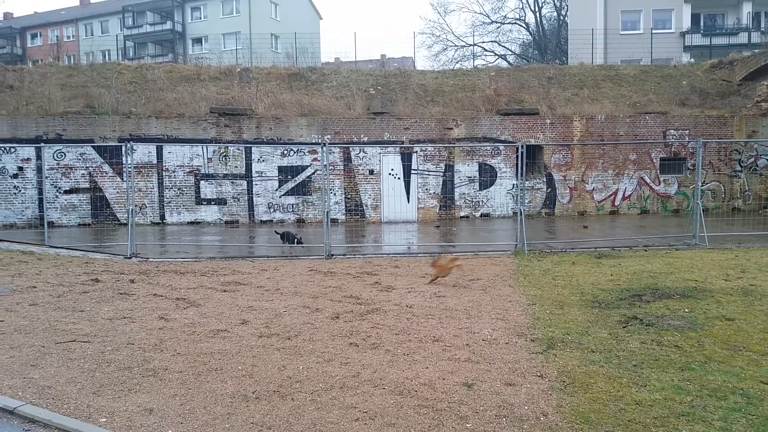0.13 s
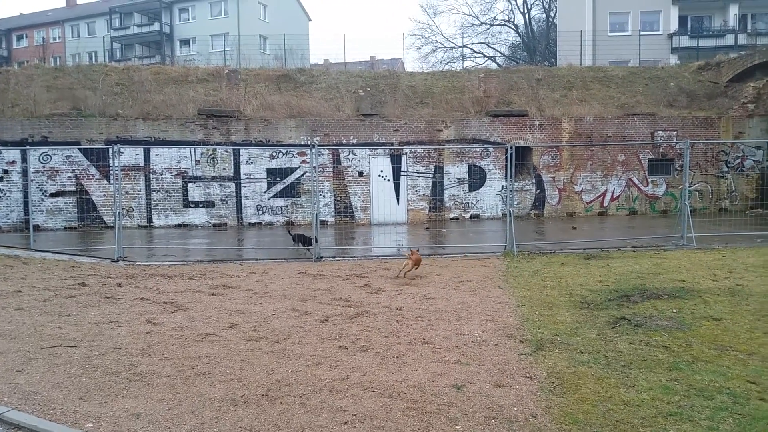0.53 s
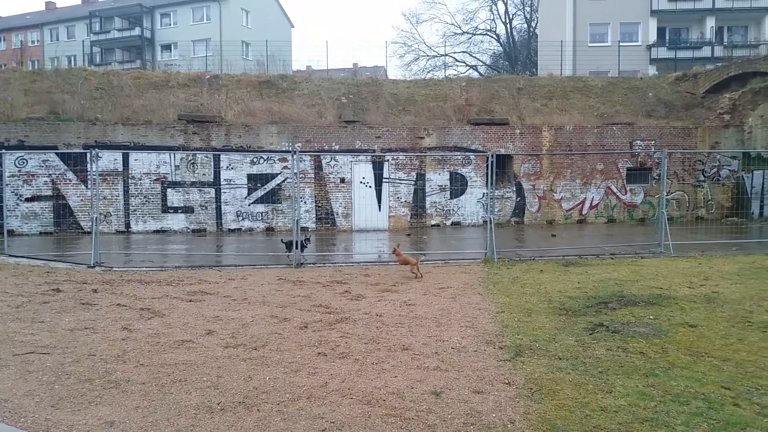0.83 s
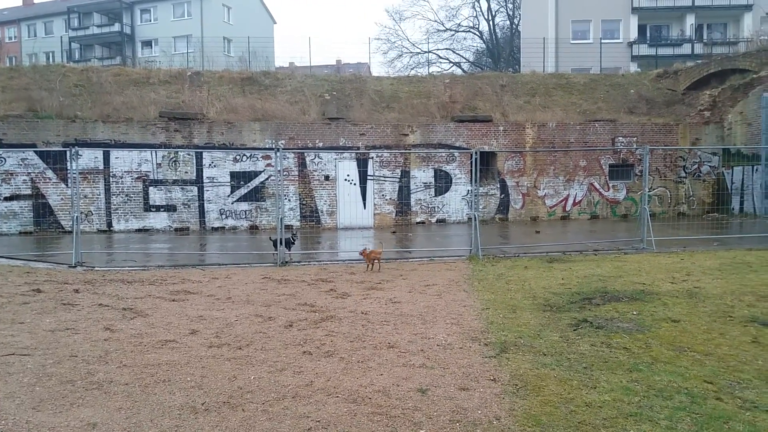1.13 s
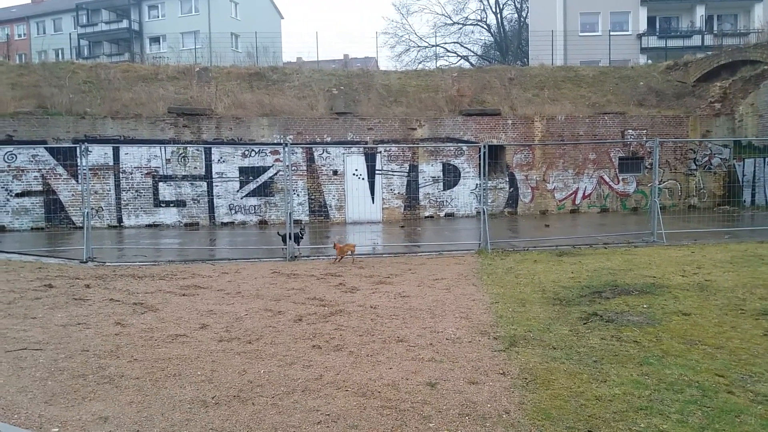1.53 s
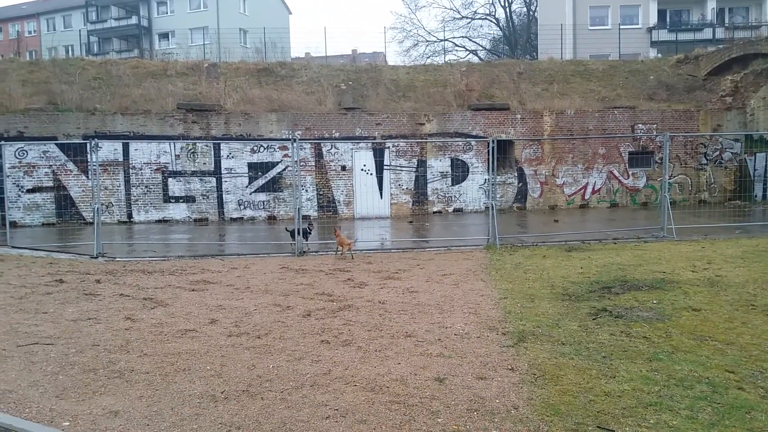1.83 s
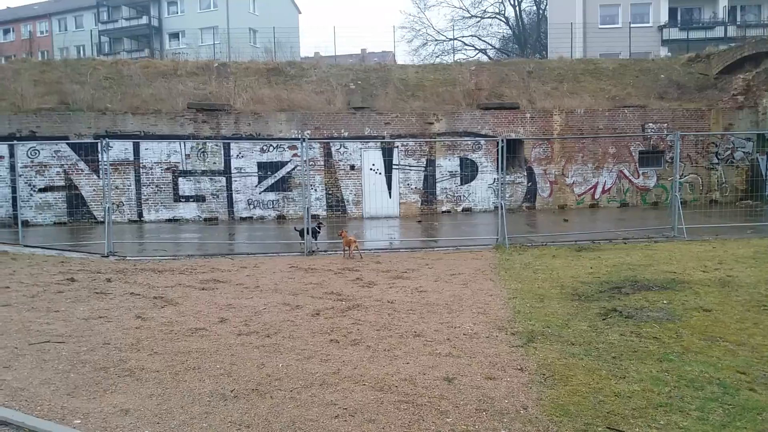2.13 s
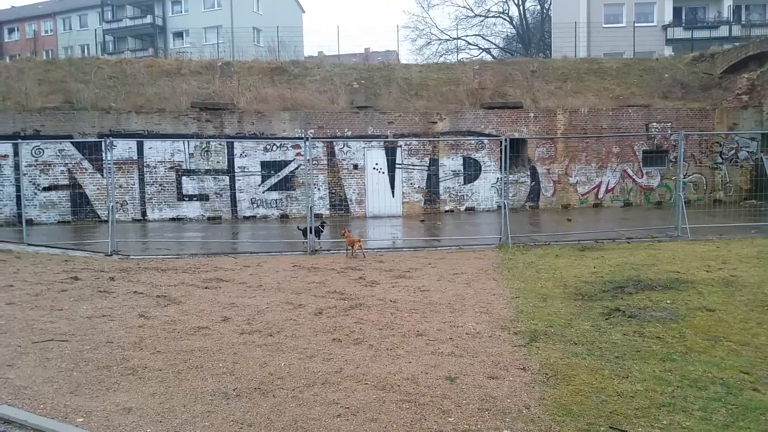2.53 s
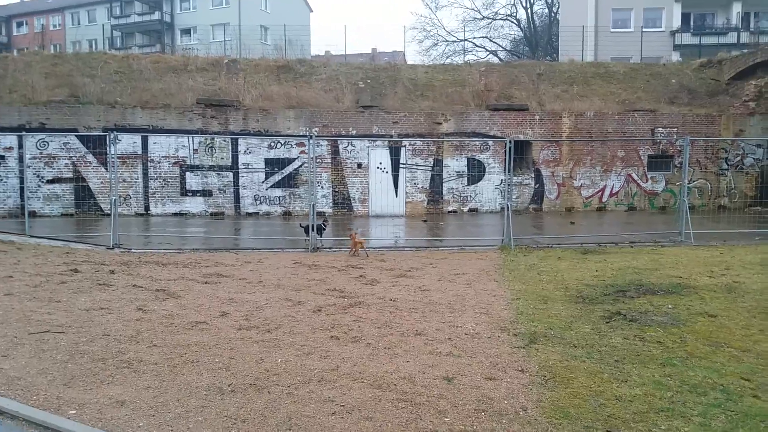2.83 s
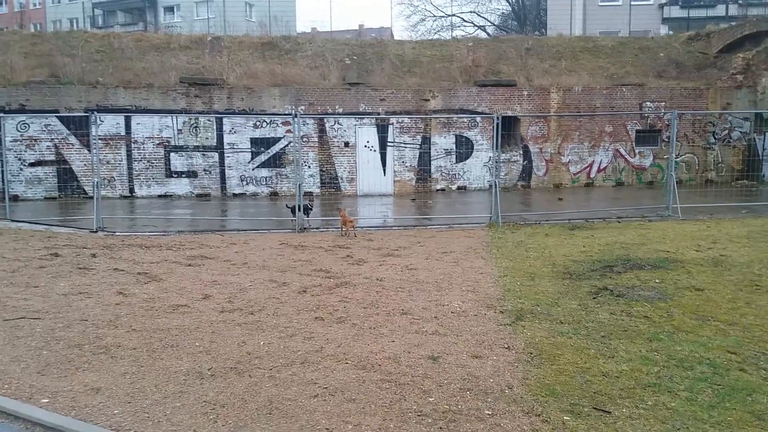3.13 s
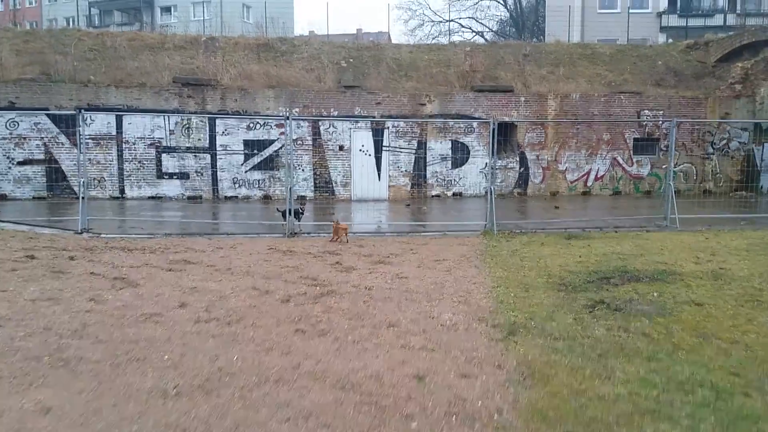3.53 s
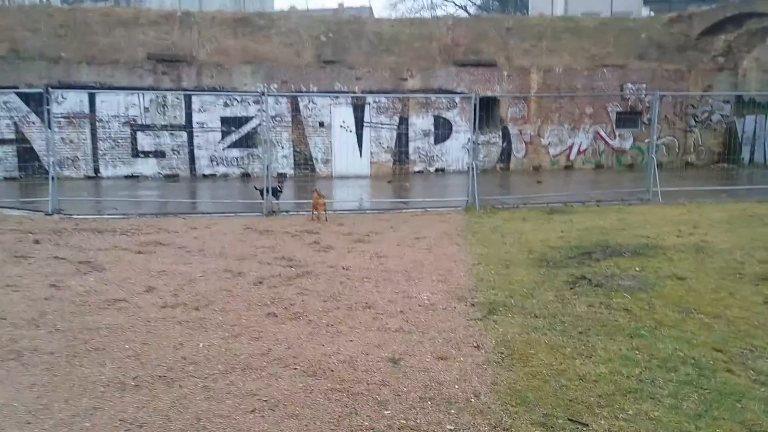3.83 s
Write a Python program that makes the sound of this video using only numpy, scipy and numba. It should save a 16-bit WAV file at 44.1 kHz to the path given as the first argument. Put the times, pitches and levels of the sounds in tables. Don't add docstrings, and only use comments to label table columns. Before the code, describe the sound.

A small dog some twenty metres off yaps twice quickly, then three more times with pauses; a brick wall echoes each. Wind buffets the phone microphone over town hum, and gravel ticks close by near the end.

```python
import sys
import numpy as np
from scipy import signal
from scipy.fft import rfft, irfft
from scipy.io import wavfile
from scipy.ndimage import uniform_filter1d
from numba import njit

SR = 44100
rng = np.random.default_rng(int(sys.argv[2]) if len(sys.argv) > 2 else 0)


def transcribe(signal):
    frames = np.atleast_2d(signal).T
    limited = np.clip(frames, -1, 1)
    pcm = np.round(limited * 32767).astype(np.int16)
    wavfile.write(sys.argv[1], SR, pcm)


def gain_from_db(level_db):
    decades = np.asarray(level_db, float) / 20
    return 10 ** decades


N = 176400
T = np.arange(N) / SR

# freq_hz, density_db
TOWN_SPECTRUM = [(200, -0.5), (600, 1.5), (1300, 0.5), (3300, -10), (4500, -16), (5200, -27.5), (6200, -30),
                 (15900, -29)]
TOWN_DB = -47
# time_s, level_db
TRAFFIC = [(0, 2), (.9, -2), (1.4, -2.5), (2.5, -2.5), (3.2, -1.5), (4, -2.5)]
# freq_hz, level_db
MOTOR_TONES = [(204.6, -48), (323.0, -52)]
MOTOR_SWELL_S = (3.301, 3.45, 3.8, 4.0)
# freq_hz, level_db
WHINE = [(13001, -93), (14998, -87)]

# time_s, level_db
GUST = [(0, -26), (.3, -26), (0.57, -24), (.66, -22), (.84, -29), (1.2, -35.5), (1.45, -40.5),
        (1.75, -31.5), (2.0, -40), (2.27, -36), (2.47, -41), (2.62, -36), (2.76, -35), (2.9, -27),
        (3.15, -28.5), (3.4, -36.5), (3.579, -31.5), (4, -40)]
# freq_hz, density_db
WIND_SPECTRUM = [(22, -72), (50, -4), (110, -1), (215, -10), (380, -20), (700, -36)]
# start_s, peak_db, pitch_hz
BUFFETS = [(0.025, -3, 111), (0.126, -8, 93), (0.612, -7.5, 137), (0.658, -3, 150.6), (1.11, -18, 124),
           (1.657, -21, 109), (1.69, -21.5, 119), (1.744, -17, 93), (2.103, -15, 96), (2.311, -18, 96.4),
           (2.576, -20.5, 127), (2.833, -25, 91), (0.151, -16, 101), (.7, -10, 108.4), (3.016, -15, 98),
           (3.121, -20, 153), (3.151, -15, 137), (3.2, -14, 103), (2.245, -14.5, 128), (2.685, -14, 107),
           (2.886, -6.5, 89.5), (2.99, -12, 119.5), (3.065, -16, 134), (3.838, -13.5, 95.5)]
BUFFET_S = 0.0094

# time_s, pitch_hz, level_db
CHIRP = [
    (1.091, 3610, -82),
    (1.097, 4070, -56),
    (1.107, 4410, -61),
    (1.141, 4470, -54.5),
    (1.15, 4170, -61),
    (1.158, 4470, -84),
]
# time_s, pitch_hz, level_db
PIP = [
    (1.071, 5100, -86),
    (1.078, 5400, -71),
    (1.085, 6130, -74),
    (1.091, 6300, -91),
]

# start_s, peak_db, ring_hz
TICKS = [(3.019, -54, 4000), (3.152, -54, 4000), (3.225, -54, 3500), (3.3495, -43, 2600),
         (3.352, -42, 3000), (3.3545, -40, 2200), (3.358, -45, 4500), (3.3628, -32, 3000),
         (3.3795, -47, 5200), (3.3912, -35, 4000), (3.3925, -35, 4600), (3.3944, -33, 3600),
         (3.4025, -37, 4300), (3.4045, -37, 3600), (3.409, -40, 4500), (3.42, -43, 3800),
         (3.586, -46, 7500), (3.735, -55, 5000)]
TICK_TOP_HZ = 9500
# start_s, length_s, level_db
SCUFFS = [
    (0, 0.056, -58.5),
    (0.258, .035, -57.5),
    (0.772, 0.025, -63),
    (3.363, 0.0224, -79),
    (3.412, 0.0272, -68),
]
START_CLICK_DB, START_CLICK_S = -44.5, .002

# time_s, pitch_hz, level_db, roughness_0_1, mouth_opening_0_1
YAP_1 = [
    (-.06, 1200, -38, 0.03, 0.8),
    (-.035, 1372, -21, .3, 0.84),
    (.01, 1320, -24, 0.19, 0.82),
    (0.023, 1199, -42, 0.42, 1),
    (.035, 1196, -27.5, 0.08, 0.9),
    (0.048, 1066, -36, 0.46, 1.15),
    (0.063, 819, -28, 0, 0.87),
    (0.073, 760, -34.5, 0.1, 0.98),
]
YAP_2 = [
    (.281, 648.4, -42, 0.12, 0.038),
    (0.291, 702.4, -28, 0.11, 0.15),
    (0.314, 821.7, -22.5, 0.52, 0.76),
    (0.333, 1002, -22.5, 0.21, 0.8),
    (.346, 844.5, -25.5, 0.99, 1),
    (0.356, 907.7, -21.5, 0.5, 1),
    (.386, 907.5, -22.5, 0.11, 0.7),
    (0.399, 803, -21.5, 0.15, 1),
    (0.411, 700, -50, 0.44, 0.052),
]
YAP_3 = [(1.727, 642, -41, 0.3, 0.054), (1.735, 694.4, -29.5, 0.67, 0.066), (1.751, 783.7, -27, 0.35, 0.75),
         (1.764, 787, -27, 0.55, 0.75), (1.785, 727.3, -26.5, 0.66, 0.87), (1.794, 771, -22, 0.29, 0.58),
         (1.797, 1210, -21.5, 0.044, 0.86), (1.821, 1186, -22.5, 0.042, 1.12),
         (1.828, 1030, -31, 0.36, 1.04), (1.838, 810, -23, 0.19, 0.3), (1.848, 755, -37.5, 0.18, 0.091)]
YAP_4 = [
    (2.742, 715.3, -52, 0.13, 0),
    (2.756, 789.5, -28, 0.33, 0),
    (2.775, 810, -30, 0.85, 0.53),
    (2.796, 655.4, -31.5, 0.4, 0.63),
    (2.827, 677, -28.5, 0.55, 0.78),
    (2.847, 830.3, -24.5, 0.49, 0.12),
    (2.857, 760, -24, 0.089, 0.88),
    (2.871, 690, -57, 0.18, 0),
]
YAP_5 = [
    (3.486, 711, -66, 0.48, 0.22),
    (3.494, 760, -29.5, 0.33, 0),
    (3.519, 808.8, -27.5, 0.5, 0.46),
    (3.553, 882.4, -26.5, 0.81, 0.94),
    (3.565, 862.3, -26, 0.39, 1),
    (3.583, 847.5, -26.5, 0.85, 0.5),
    (3.598, 760, -26, 0.16, 1),
    (3.612, 700, -84, .3, 0.58),
]
# closed_hz, open_hz, width_hz, closed_db, open_db
TRACT = [(760, 957, 350, -6, 4.5), (1200, 1464, 333, -15.5, -0.5), (1730, 1573, 75, -32.5, -1.5),
         (1620, 2140, 425, -26, 2.5), (3440, 3440, 280, -47, -17), (4540, 4750, 560, -38.5, -23.5),
         (4900, 5550, 450, -45.5, -29), (7000, 6560, 1400, -58, -34.5), (8400, 8400, 3000, -73, -38)]
# mouth_size_factor, res1_db, res2_db, res3_db, res4_db
VOICING = [
    (1.08, 3, -8, 9.5, 1.5),
    (1.046, 4, -6, 4.5, 4.5),
    (0.989, -2, 3, -5, -0.5),
    (0.998, -2, 3.5, 1.5, 4),
    (0.933, -1, 3.5, 5.5, 0.5),
]
RINGS = [
    (-1, -1, -6, -5, -1),
    (-5, 0.5, -1.5, 4, -1),
    (3, 0, -3, -3, -6),
    (9, 2, 3.5, 2, 0),
    (-5, 0.5, 2, 5, -7),
]
# growl_hz, speedup_hz_per_s, depth_db
GROWL = [
    (44.5, -10, 2),
    (49.7, -2.5, 1.5),
    (56, -1, 2),
    (60.7, 0, 5.5),
    (37, 170, 5),
]
JITTER, SHIMMER_DB, CHAOS_HZ, CORD_TILT = .18, 3.5, 180, .6
BREATH_DB, FLUTTER_HZ, FLUTTER_DB = 2, 60, 3
PATCH_HZ, PATCH_DB = 25, 2.5
LEAD_S = .1

# lag_s, level_db, far_tail_db
WALL = [
    (0.059, -16, 2.5),
    (0.055, -8.5, 3.5),
    (.0465, -6.5, 1.5),
    (0.034, -5.5, 3),
    (.0477, -6, 5.5),
]
WALL_TILT, SCATTER_S, SCATTER_DB = 1, 0.016, -3
FAR_ECHO_S, FAR_ECHO_DB = 0.068, -12.5
TAIL_DB, TAIL_T60_S, TAIL_START_S, TAIL_HZ, TAIL_WIDTH_HZ = -9.5, 1, 0.033, 1910, 2800
# freq_hz, width_hz, level_db
NICHES = [
    (1460, 70, 11),
    (1640, 60, 10),
    (2460, 120, 9.5),
    (6000, 3500, 6),
]


def unit(x):
    return x / np.sqrt(np.mean(x ** 2) + 1e-30)


@njit
def moving_band(x, hz, width_hz):
    y, b, l = np.empty(len(x)), 0., 0.
    for i in range(len(x)):
        g, k = np.tan(np.pi * hz[i] / SR), width_hz / hz[i]
        v = (b + g * (x[i] - l)) / (1 + g * (g + k))
        b, l, y[i] = 2 * v - b, l + 2 * g * v, k * v
    return y


def band(x, hz, width_hz):
    return moving_band(x, np.full(len(x), 1. * hz), 1. * width_hz)


def walk(rate_hz, size=N):
    k = max(int(SR / rate_hz), 1)
    held = np.repeat(rng.standard_normal(N // 50)[:size // k + 1], k)
    return 1.288 * uniform_filter1d(uniform_filter1d(held, k), k)[:size]


def bands(table, step_oct, wobble_db):
    hz, db = np.array(table).T
    f, out = np.arange(N // 2 + 1) * SR / N + 1e-3, 0
    shape = gain_from_db(np.interp(np.log(f), np.log(hz), db)) * (f > hz[0]) * (f < hz[-1])
    for centre in hz[0] * 2 ** np.arange(0, np.log2(hz[-1] / hz[0]) + step_oct, step_oct):
        part = np.sqrt(np.clip(1 - np.abs(np.log2(f / centre)) / step_oct, 0, 1))
        noise = irfft(rfft(rng.standard_normal(N)) * shape * part, N)
        out = out + gain_from_db(wobble_db(centre)) * noise
    return unit(out)


def town():
    swell_db = .5 * walk(0.24) + np.interp(T, *np.array(TRAFFIC).T)
    out = bands(TOWN_SPECTRUM, 0.508, lambda hz: (swell_db + 0.6 * walk(27)) * (hz < 7000)) * gain_from_db(TOWN_DB)
    swell = np.interp(T, MOTOR_SWELL_S, (0, 1, 1, 0))
    for hz, db in MOTOR_TONES:
        level = gain_from_db(db + 6.5 + 2.5 * walk(18)) * swell
        out = out + level * np.sin(2 * np.pi * np.cumsum(hz * (1 + 0.0142 * walk(12))) / SR)
    return out + sum(gain_from_db(db - 4) * np.sin(2 * np.pi * hz * T) for hz, db in WHINE)


def wind():
    s, db = np.array(GUST).T
    eddy = walk(21.63)
    out = bands(WIND_SPECTRUM, .5, lambda hz: 1.98 * eddy + 2.46 * walk(hz / 6) * min(hz / 100, 1))
    out = out * gain_from_db(np.interp(T, s, db) - 1.5)
    for s, db, hz in BUFFETS:
        u = (T - s) / BUFFET_S - 1
        out = out + gain_from_db(db - 9.5) * np.exp(-u ** 2) * np.sin(2 * np.pi * hz * (T - s))
    return out


def bird():
    out = 0
    for rows in (CHIRP, PIP):
        s, hz, db = np.array(rows).T
        level = gain_from_db(np.interp(T, s, db + 3.5, -150, -150))
        out = out + level * np.sin(2 * np.pi * np.cumsum(np.interp(T, s, hz)) / SR)
    return out


def gravel():
    out, t = np.zeros(N), T[:400]
    for s, db, hz in TICKS:
        impact = rng.standard_normal(len(t)) * np.exp(-t / .0012)
        ring = 4 * band(band(impact, hz, 1600), hz, 2500)
        crack = .1 * band(impact, 7500, 5000) + ring + 1.5 * band(impact, 2200, 1500)
        out[int(s * SR):int(s * SR) + len(t)] += gain_from_db(db) * crack / np.abs(crack).max()
    out = signal.sosfilt(signal.butter(6, TICK_TOP_HZ, fs=SR, output="sos"), out)
    out = out + gain_from_db(START_CLICK_DB) * rng.standard_normal(N) * np.exp(-T / START_CLICK_S)
    grit = unit(band(band(rng.standard_normal(N) * gain_from_db(1.1 * walk(540)), 3700, 4200), 3700, 6000))
    for s, length, db in SCUFFS:
        gate = np.clip(np.minimum((T - s) / 0.0015, (s + length - T) / 0.0093), 0, 1)
        out = out + gain_from_db(db) * gate * grit
    return out


def vocal_cords(hz, rough):
    n = len(hz)
    jitter = np.clip(JITTER * rough * walk(3 * CHAOS_HZ, size=n), -.6, .6)
    phase = 2 * np.pi * np.cumsum(hz * (1 + jitter)) / SR
    cords = unit(sum(np.cos(k * phase) / k ** CORD_TILT * (k * hz < 11000) for k in range(1, 15)))
    cords = cords * gain_from_db(SHIMMER_DB * rough * walk(CHAOS_HZ, size=n))
    breath = gain_from_db(BREATH_DB) * (1 + np.cos(phase)) * rng.standard_normal(n)
    return (1 - .5 * rough) * cords + (rough + 0.4) * breath


def yap(rows, voicing, growl, rings_db):
    s, hz, db, rough, mouth = np.array(rows, float).T
    start, n = int((s[0] + LEAD_S) * SR), int(.2 * SR)
    t = s[0] + T[:n]
    hz, rough, mouth = (np.interp(t, s, c) for c in (hz, np.clip(rough, 0, 1), mouth))
    source = vocal_cords(hz, rough)
    flutter_db = FLUTTER_DB * np.sqrt(rough) * walk(2 * FLUTTER_HZ, size=n) * 0.34
    mouth_size, colour_db = voicing[0], list(voicing[1:]) + list(rings_db)
    opened = uniform_filter1d(mouth, int(.02 * SR), origin=int(.01 * SR) - 1)
    parts = []
    for k, (shut_hz, open_hz, width_hz, shut_db, open_db) in enumerate(TRACT):
        centre = mouth_size * (shut_hz + (open_hz - shut_hz) * mouth)
        patch_db = PATCH_DB * walk(PATCH_HZ, size=n) * (k > 3)
        level_db = patch_db + colour_db[k] + shut_db + (open_db - shut_db) * opened
        ring = moving_band(moving_band(source, centre, 1. * width_hz), centre, 1.5 * width_hz)
        parts.append((-1) ** k * gain_from_db(level_db) * ring)
    voice = sum(parts)
    loudness = np.sqrt(uniform_filter1d(voice ** 2, int(0.02 * SR)) + 1e-9)
    growl_hz, speedup, growl_db = growl
    turns = 0.19 + growl_hz * T[:n] + speedup / 2 * T[:n] ** 2
    chop_db = growl_db * (np.abs(np.sin(np.pi * turns)) * 2 - 1.3)
    voice = (gain_from_db(chop_db) * parts[0] + gain_from_db(0.21 * chop_db) * (voice - parts[0])) / loudness
    out = np.zeros(N + int(LEAD_S * SR))
    out[start:start + n] = voice * gain_from_db(np.interp(t, s, db, right=-150) + flutter_db)
    return out


def brick_wall():
    scatter = unit(rng.standard_normal(SR)) * np.exp(-T[:SR] / SCATTER_S)
    wall = gain_from_db(SCATTER_DB) * scatter / np.sqrt(SCATTER_S * SR / 2)
    wall[0] = 1
    return wall + gain_from_db(FAR_ECHO_DB) * np.roll(wall, int(FAR_ECHO_S * SR))


def house_fronts():
    t = T[:SR]
    decay = gain_from_db(-60 * t / TAIL_T60_S + 3.7 * walk(42.6, size=SR))
    noise = rng.standard_normal(SR) * decay * np.clip(t / TAIL_START_S, 0, 1) ** 2
    tail = band(noise, TAIL_HZ, TAIL_WIDTH_HZ)
    tail = tail + sum(gain_from_db(db) * band(noise, hz, width_hz) for hz, width_hz, db in NICHES)
    return gain_from_db(TAIL_DB) * tail / np.sqrt(np.sum(tail ** 2)) / 3


def dog():
    wall, tail = brick_wall(), house_fronts()
    direct, echo, far = 0, 0, 0
    yaps = (YAP_1, YAP_2, YAP_3, YAP_4, YAP_5)
    for rows, (lag_s, db, far_db), voicing, growl, rings_db in zip(yaps, WALL, VOICING, GROWL, RINGS):
        one = yap(rows, voicing, growl, rings_db)
        back = gain_from_db(db) * np.roll(one, int(lag_s * SR))
        direct = direct + one
        echo = echo + back
        far = far + gain_from_db(far_db) * (one + back)
    echo = signal.fftconvolve(echo + WALL_TILT * band(echo, 3140, 2500), wall)[:len(direct)]
    return (direct + echo + signal.fftconvolve(far, tail)[:len(direct)])[-N:]


def scene():
    return (town() + wind() + bird() + gravel() + dog())[None]


def band_limit(x):
    return signal.sosfilt(signal.butter(12, 15720, fs=SR, output="sos"), x)


def record(dry):
    return band_limit(dry)


dry = scene()
out = record(dry)
transcribe(out)
```